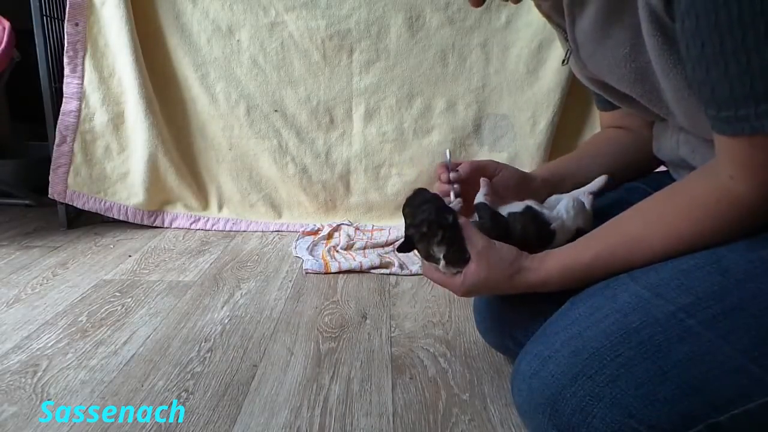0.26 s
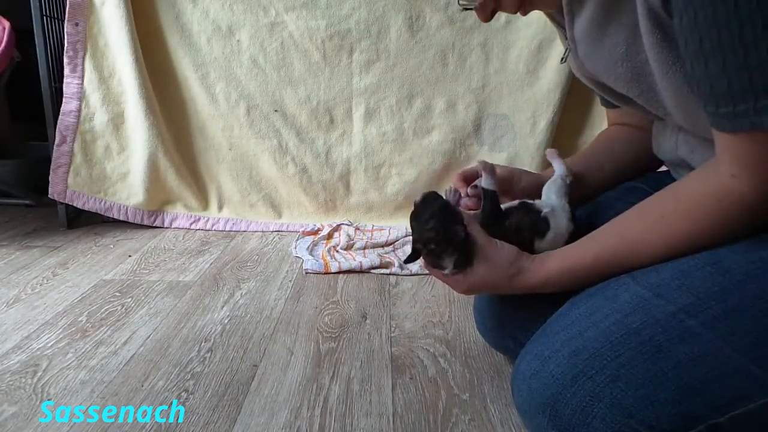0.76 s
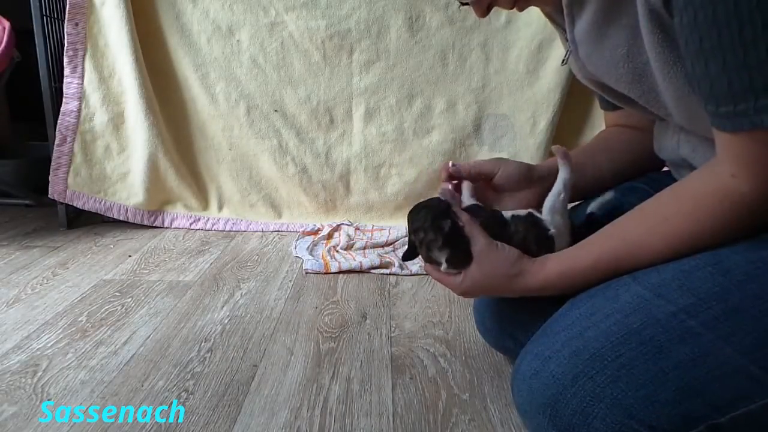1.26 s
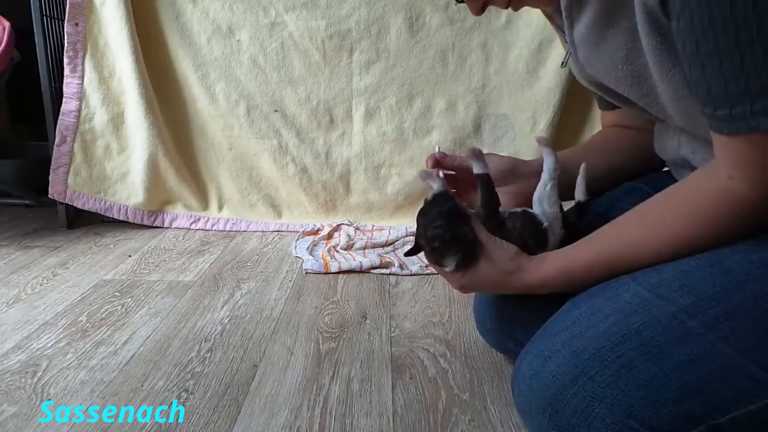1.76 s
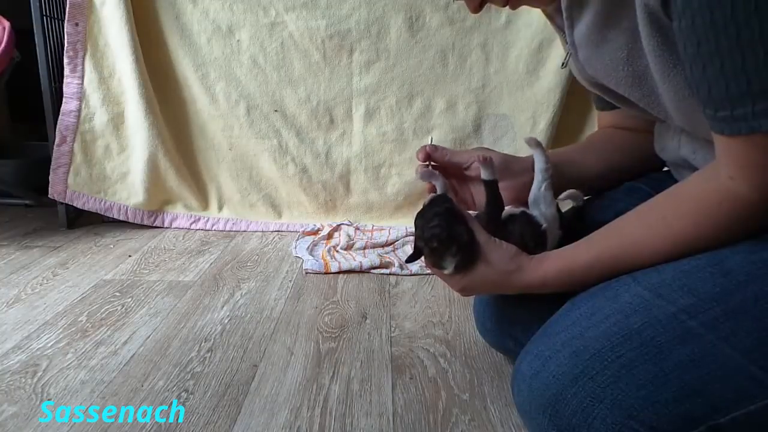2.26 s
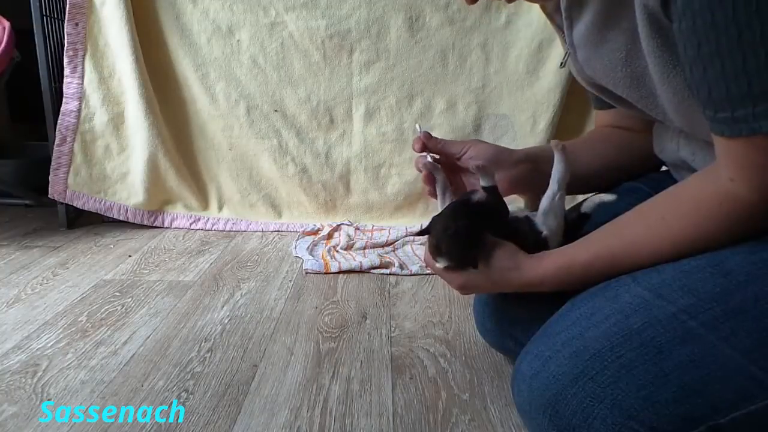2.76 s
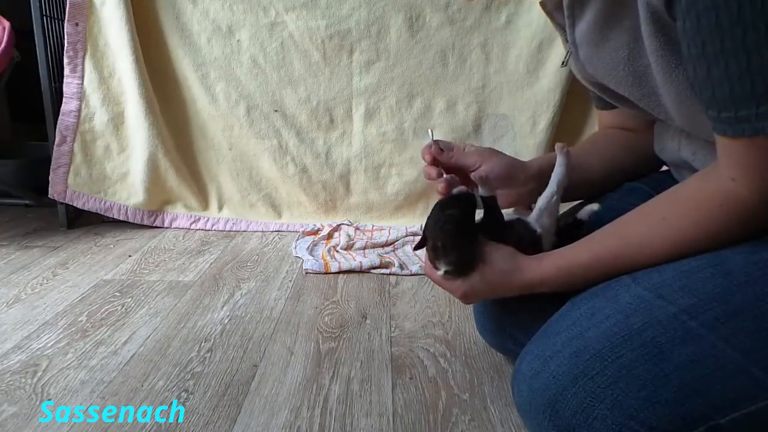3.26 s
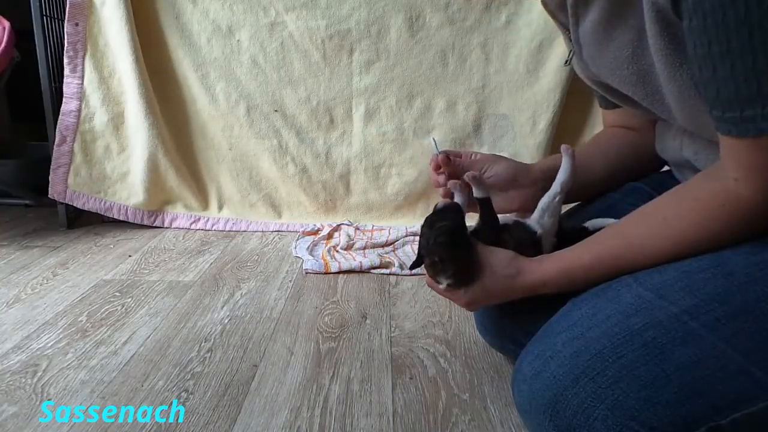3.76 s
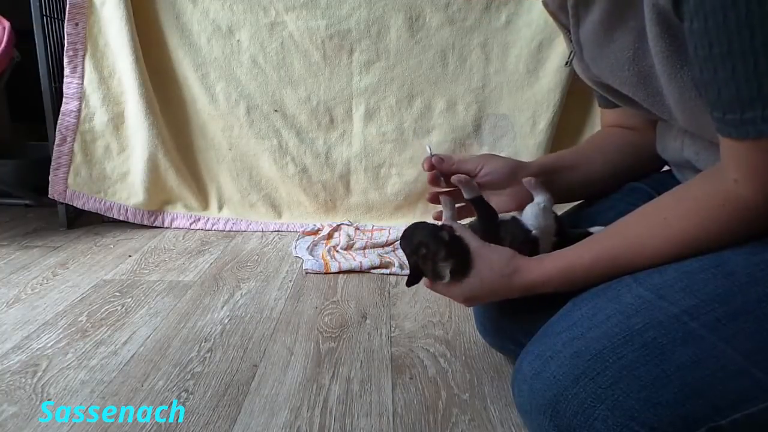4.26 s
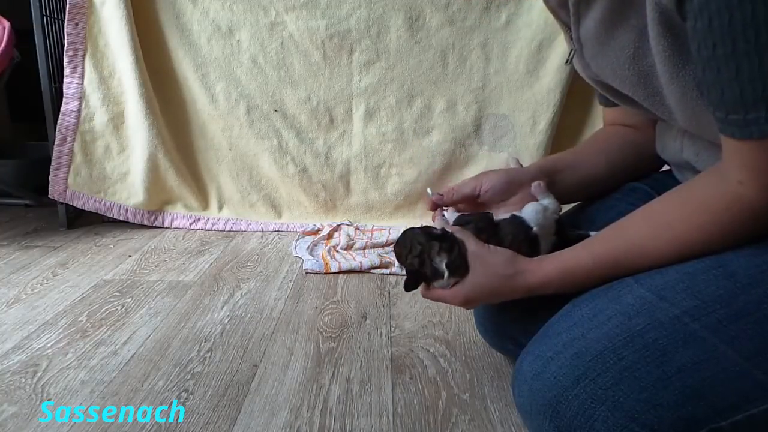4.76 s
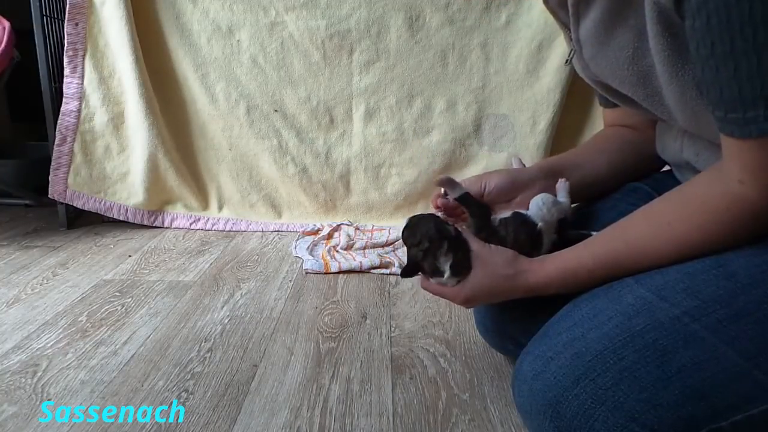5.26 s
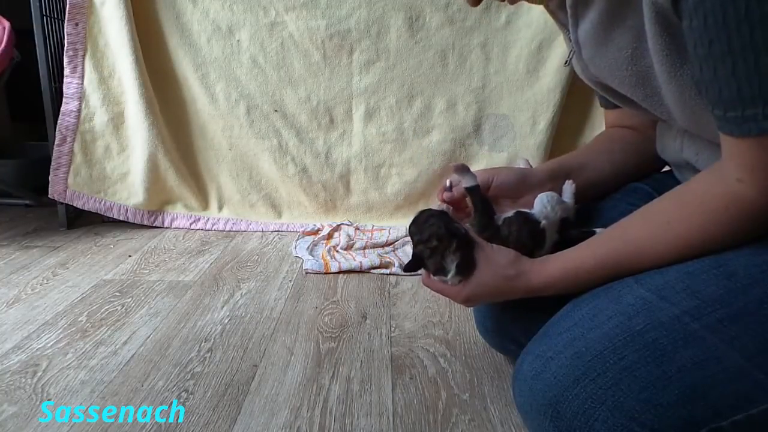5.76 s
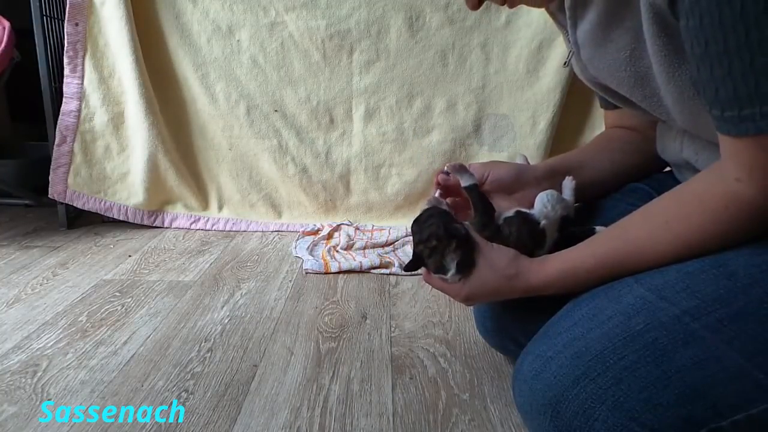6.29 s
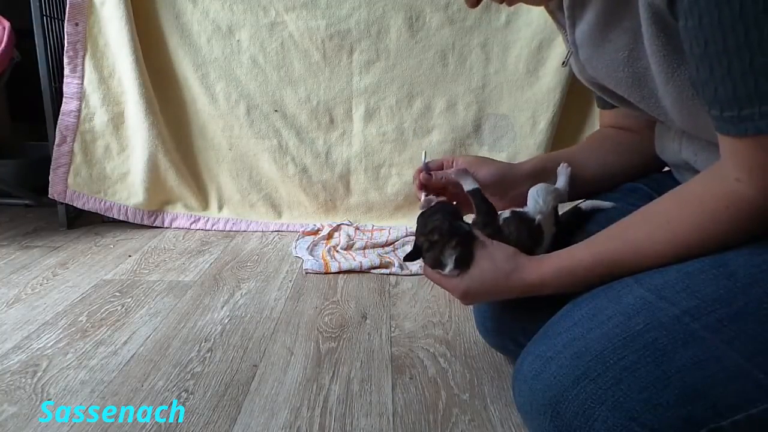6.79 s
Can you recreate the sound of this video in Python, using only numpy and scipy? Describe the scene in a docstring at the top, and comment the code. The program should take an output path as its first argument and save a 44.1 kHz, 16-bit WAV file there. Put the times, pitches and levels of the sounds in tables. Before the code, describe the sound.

Faint low grunts from a tiny puppy give way to a run of loud, thin, falling cries, with a few soft handling bumps indoors.

```python
"""A newborn puppy grunts, whimpers and then cries, held in someone's hands in a small hard-floored room.
Its vocal folds buzz and its breath rasps past them. A cry climbs from a hoarse start, breaks into a
nearly pure squeal around 2 kHz and falls away, sometimes with an added tone an octave below.
The hands bump softly, and the camera's noise suppressor turns the hiss down between the calls."""
import sys
import numpy as np
from scipy import signal
from scipy.fft import rfft, irfft, next_fast_len
from scipy.io import wavfile
from scipy.ndimage import uniform_filter1d, map_coordinates

SR = 44100
rng = np.random.default_rng(int(sys.argv[2]) if len(sys.argv) > 2 else 0)


def transcribe(signal):
    """Save signal, clipped to [-1, 1], as a 16-bit WAV file at the path in sys.argv[1]."""
    frames = np.atleast_2d(signal).T
    limited = np.clip(frames, -1, 1)
    pcm = np.round(limited * 32767).astype(np.int16)
    wavfile.write(sys.argv[1], SR, pcm)


N = 310023
TOP_HZ = 14600  # the highest frequency kept


def puppy():
    """All the grunts and squeals, from one throat and its breath."""
    # air rasping through the throat: f/Hz, level/dB
    rasp_spectrum = [(100, -22), (300, 6), (1000, 7), (2200, 0.5), (3200, -23), (5000, -45.5),
                     (8000, -47.5), (11000, -24.5), (15000, -25.5)]
    # air hissing out of the open mouth: f/Hz, level/dB
    mouth_spectrum = [(1500, -13.5), (2600, 8.5), (3300, 5), (4200, 0.5), (5200, -14), (6300, -6.5),
                      (7800, -11.5), (10000, -7), (14000, -5)]
    # low calls: start/s, top/s, end/s, start pitch/Hz, top pitch/Hz, end pitch/Hz, level/dB, swell/dB,
    # overtones against the lowest tone/dB, roughness/0-1, overtone slope/dB per octave, mouth resonance/Hz
    grunts = [(.005, 0.039, .135, 335, 381, 338, -50, -5.5, -5.5, 0.24, -1, 816),
              (0.371, 0.417, .49, 280, 306.2, 257, -70.5, 5, 12.5, 0.37, -7, 680),
              (0.737, 0.872, .935, 396, 1466, 630, -59, -2.5, -5, 0.92, -14, 2010),
              (1.613, 1.668, 1.75, 319, 338, 326, -67, -1, -5.5, 0.77, 3, 1293),
              (1.933, 1.947, 2.02, 277, 318.5, 310, -58, -14, -4, 0.36, -18, 664),
              (2.184, 2.25, 2.35, 260, 311.6, 280.3, -54.5, -1.5, -2.5, 0.63, -7, 556),
              (2.491, 2.553, 2.58, 285.4, 338, 318, -62, -1, -1.5, 1, -15, 1020),
              (2.573, 2.631, 2.71, 472, 1124, 460, -55.5, 4, -10, 0.49, -18, 1910),
              (4.469, 4.574, 4.745, 362.8, 500, 427, -52, 3, -2.5, 0.22, 2, 813),
              (4.899, 5.051, 5.15, 310, 438.5, 345.3, -54.5, -1, -1, 0.65, -7, 900),
              (4.965, 5.039, 5.14, 355.8, 1222, 497, -45, 6, -2.5, 0.47, -1.5, 2190)]
    # high cries: hoarseness, brightness/dB, overtone slope/dB per octave, mouth resonance/Hz,
    # list of (t/s, pitch/Hz, level/dB)
    squeals = [ (0.25, -1.5, -18, 5460, [(1.125, 1610, -57.5), (1.188, 1770, -63.5), (1.196, 1787, -35.5),
               (1.248, 1850, -44.5), (1.256, 1882, -39.5), (1.285, 2040, -42.5), (1.315, 2004, -49.5),
               (1.365, 1184, -64.5)]), (0.99, 0, -8.5, 3100, [(2.895, 1558, -66.5), (2.93, 1715, -52.5),
               (2.965, 1875, -46.5), (3, 1760, -45), (3.04, 1672, -47), (3.07, 1409, -56),
               (3.125, 1376, -61.5)]), (0.47, -1.5, -17, 10800, [(3.255, 1126, -62), (3.3, 1674, -45.5),
               (3.318, 1655, -41), (3.338, 2138, -26.5), (3.37, 2246, -29), (3.45, 2189, -33),
               (3.485, 1938, -39.5), (3.535, 1765, -44), (3.56, 1287, -52), (3.59, 1202, -54)]),
               (1.23, 0.5, -16, 12300, [(3.735, 1140, -60.5), (3.77, 1924, -45.5), (3.83, 2173, -40),
               (3.841, 2383, -26), (3.865, 2326, -36.5), (3.96, 1992, -38), (4.03, 1986, -52),
               (4.18, 1887, -45.5), (4.205, 1289, -56.5), (4.24, 1196, -53)]),
               (0.58, -1.5, -10, 10400, [(5.315, 474, -61), (5.36, 1071, -45.5), (5.368, 1694, -40.5),
               (5.404, 1793, -38.5), (5.411, 2035, -26), (5.445, 2131, -21.5), (5.472, 2032, -22),
               (5.515, 1665, -41.5), (5.548, 1449, -40.5), (5.6, 1312, -68)]),
               (1.27, -1.5, -5.5, 10000, [(5.78, 399.3, -61), (5.848, 1075, -46), (5.856, 1627, -51),
               (5.905, 1906, -36.5), (5.945, 1890, -40.5), (6, 1637, -47.5), (6.028, 1407, -52),
               (6.075, 1443, -58.5)]), (0.98, -2.5, -9, 11000, [(6.247, 482.8, -60), (6.305, 1045, -48.5),
               (6.33, 1403, -48), (6.397, 1643, -51.5), (6.405, 1744, -40), (6.44, 1720, -56),
               (6.475, 1589, -49), (6.492, 946, -52), (6.52, 911, -64)]),
               (0.51, -0.5, -12.5, 5900, [(6.7, 1085, -60.5), (6.742, 1763, -45.5), (6.775, 1680, -47),
               (6.795, 2028, -28), (6.815, 2029, -23), (6.852, 1936, -34), (6.876, 1796, -38),
               (6.915, 1421, -48.5), (6.98, 1395, -60.5)])]
    air = np.array([noise(rasp_spectrum), noise(mouth_spectrum)])
    return sum(grunt(row, air) for row in grunts) + sum(squeal(row, air) for row in squeals)


def squeal(row, air, easy_db=-39.5, rough_per_db=0.002):
    """A high cry: hoarse and rich while low, nearly pure at the top, shrill where the puppy strains."""
    # the higher, the purer: pitch/Hz, overtones against the lowest tone/dB, roughness/0-1
    register = [(500, 7, 0.32), (1060, -0.5, 0.45), (1490, -11.5, 0.33), (1717, -18, 0.09),
                (1950, -21.5, 0.03), (2380, -23.5, 0.03)]
    # moments of strain: t/s, half length/s, change in the overtones/dB
    strains = [(1.249, 0.068, 20), (3.081, 0.013, 15.5), (3.338, 0.05, 9.5), (3.817, 0.029, 6),
               (4.225, 0.016, -2.5), (5.432, 0.0056, 4.5), (6.841, .025, 11), (6.933, 0.045, 23.5)]
    hoarseness, bright_db, slope_db, mouth_hz, course = row
    times, hz, db = np.transpose(course)
    t, fade = span(times[0], times[-1])
    pitch, level_db = np.interp(t, times, hz), np.interp(t, times, db)
    register_hz, register_db, register_rough = np.transpose(register)
    strain_db = sum(raised_db * bell(t, when, width) for when, width, raised_db in strains)
    effort_db = 0.099 * (level_db - easy_db)  # louder is also brighter
    overtones_db = np.interp(pitch, register_hz, register_db) + bright_db + strain_db + effort_db
    rough = hoarseness * np.interp(pitch, register_hz, register_rough) + rough_per_db * strain_db
    return voice(t, fade, pitch, level_db, overtones_db, rough, slope_db, mouth_hz, air)


def grunt(row, air, swoop_s=0.047, waver=0.015, lumpy_db=0.86, start_dip_db=2, end_dip_db=9.5):
    """A low call that swells and sinks while its pitch swoops up and back."""
    start, top, end, start_hz, top_hz, end_hz, db, swell_db, overtones_db, rough, slope_db, mouth_hz = row
    t, fade = span(start, end)
    swoop = bell(t, top, swoop_s)
    rest_hz = np.where(t < top, start_hz, end_hz)
    pitch = (rest_hz + (top_hz - rest_hz) * swoop) * (1 + waver * wobble(70, len(t)))
    from_middle = np.interp(t, [start, end], [-1, 1])
    dip_db = np.where(from_middle < 0, start_dip_db, end_dip_db) * np.abs(from_middle) ** 2.04
    level_db = db + swell_db * from_middle / 2 - dip_db + lumpy_db * wobble(51, len(t))
    rough = rough * (1 - 0.4 * swoop)  # clearest at the top
    return voice(t, fade, pitch, level_db, overtones_db, rough, slope_db, mouth_hz, air)


def voice(t, fade, pitch, level_db, overtones_db, rough, slope_db, mouth_hz, air,
          mouth_db=10, mouth_octaves=0.11, tremor=0.0038, hiss_db=-21):
    """One call: the vocal folds beat at the pitch; the rougher they beat, the more air rasps past."""
    # resonances of the tiny throat: f/Hz, gain/dB
    throat = [(300, 21), (1100, 21.5), (1600, 7), (2200, 12), (2900, -8), (4100, -22.5), (5000, -17),
              (6200, -12), (7800, -21.5), (9000, -8), (10500, -9.5), (12500, -6), (14500, -19)]
    first, size = round(t[0] * SR), len(t)
    rough = np.clip(rough, 0, 1)
    # no two beats last quite as long, least of all in a hoarse voice
    scatter = (0.004 + 0.075 * rough) * wobble(650, size)
    pitch = pitch * (1 + tremor * wobble(90, size) + scatter)
    phase = 2 * np.pi * np.cumsum(pitch) / SR
    # overtones are multiples of the pitch; they slide through the resonances of throat and mouth
    multiple = np.arange(2, 17)[:, None]
    hz = multiple * pitch
    boost_db = mouth_db * np.exp(-(np.log2(hz / mouth_hz) / mouth_octaves) ** 2)
    weights = amp(along(throat, hz) + boost_db + slope_db * np.log2(multiple)) * (hz < TOP_HZ)
    overtones = np.sum(weights * np.sin(multiple * phase), axis=0) / np.linalg.norm(weights, axis=0)
    tone = amp(level_db) * (np.sin(phase) + amp(overtones_db) * overtones) + voice_break(t, phase)
    flutter = (1 + rough * wobble(300, size)) * amp(wobble(70, size))
    throat_air, mouth_air = air[:, first:first + size]
    hiss = amp(level_db + overtones_db + hiss_db) * mouth_air
    puffs = (1 + np.sin(phase)) * throat_air  # one each time the folds open
    rasp = 0.6 * rough ** 1.2 * amp(level_db) * np.hypot(1, amp(overtones_db)) * puffs
    call = fade * (np.sqrt(2) * tone * flutter + rasp + hiss)
    return np.pad(call, (first, N - first - size))


def voice_break(t, phase, rise_s=0.004, fall_s=0.0096):
    """As some cries run out, the folds beat unevenly and add a tone an octave below."""
    # stretches of uneven beating: start/s, end/s, level/dB
    breaks = [(3.095, 3.102, -58), (5.561, 5.595, -50), (6.037, 6.059, -49), (6.926, 6.97, -55)]
    strength = sum(amp(db) * np.interp(t, [start - rise_s, start, end, end + fall_s], [0, 1, 1, 0])
                   for start, end, db in breaks)
    return strength * np.sin(phase / 2)


def hands():
    """Dull bumps as the grip on the wriggling puppy shifts."""
    # soft bumps: t/s, level/dB, half length/s
    bumps = [(1.262, -69, 0.024), (4.176, -53.5, 0.021), (5.046, -53.5, 0.042), (6.898, -66.5, 0.13)]
    # a hand on fur and cloth: f/Hz, level/dB
    thud_spectrum = [(40, -41), (110, -6), (170, 5), (260, -10.5), (600, -48), (3000, -76.5)]
    t = np.arange(N) / SR
    return noise(thud_spectrum) * sum(amp(db) * bell(t, when, width) for when, db, width in bumps)


def room(x, gap_s=0.0037, build_s=0.004):
    """The walls keep each passing pitch ringing, so it beats against the gliding voice."""
    # the room's ring: f/Hz, time to fade by 60 dB/s
    ring_times = [(200, 0.3), (2000, 0.35), (6000, 0.29), (13000, 0.25)]
    # the mouth aims its treble past the microphone: f/Hz, direct sound/dB, sound off the walls/dB
    beam = [(2270, 0, -0.5), (4000, -8.5, -1.5), (10000, -2, 3)]
    # standing waves between floor and walls lift or weaken low notes: f/Hz, gain/dB
    standing_waves = [(250, -0.5), (335, 1.5), (375, -1.5), (425, 4), (495, -9), (570, -0.5), (650, -0.5),
                      (780, 0), (950, 0), (1150, -1)]
    hz, t, spectra = signal.stft(rng.standard_normal(SR // 2), SR, nperseg=256)
    decay = amp(-60 * t / along(ring_times, hz)[:, None])
    tail = signal.istft(spectra * decay, SR, nperseg=256)[1]
    tail *= np.clip((np.arange(len(tail)) / SR - gap_s) / build_s, 0, 1)
    ring = signal.fftconvolve(x, tail / np.linalg.norm(tail))[:N]
    beam_hz, direct_db, walls_db = np.transpose(beam)
    direct = filtered(x, lambda hz: amp(np.interp(hz, beam_hz, direct_db)))
    walls = filtered(ring, lambda hz: amp(np.interp(hz, beam_hz, walls_db)))
    return filtered(direct + walls, lambda hz: amp(along(standing_waves, hz)))


def background_hiss():
    """The faint, steady noise of the room and the microphone."""
    # low room noise and hiss: f/Hz, level/dB
    hiss_spectrum = [(25, -24), (45, -14), (70, -4.5), (108, -5.5), (128, 6.5), (148, -2), (220, -6.5),
                     (400, -10.5), (1000, -14.5), (2000, -25.5), (4000, -26.5), (7500, -26.5),
                     (11000, -26.5), (14500, -28.5)]
    return amp(-61) * noise(hiss_spectrum)


def suppressor(x, closed_db=-63, open_db=-50, depth_db=12, bass_share=0.8, window_s=0.054, glide_s=0.067):
    """Turns everything down while the voice's range is quiet, the bass less so."""
    voice_band = filtered(x, lambda hz: (hz > 250) & (hz < 3000))
    power = np.abs(uniform_filter1d(voice_band ** 2, int(window_s * SR)))
    level_db = 10 * np.log10(power + 1e-12)
    quietness = np.clip((open_db - level_db) / (open_db - closed_db), 0, 1)
    cut_db = uniform_filter1d(depth_db * quietness, int(glide_s * SR))
    bass = filtered(x, lambda hz: 1 / (1 + (hz / 200) ** 4))
    return bass * amp(-bass_share * cut_db) + (x - bass) * amp(-cut_db)


def span(start, end, attack_s=0.008, release_s=0.0061):
    """The sample times of one call, and its fade in and out."""
    t = np.arange(max(0, int((start - attack_s) * SR)), min(N, int((end + release_s) * SR))) / SR
    return t, np.interp(t, [start - attack_s, start, end, end + release_s], [0, 1, 1, 0])


def bell(t, centre, width):
    """A smooth hump of height 1."""
    return np.exp(-0.5 * ((t - centre) / width) ** 2)


def amp(db):
    """Turns decibels into a number to multiply by."""
    return 10 ** (np.asarray(db) / 20)


def along(points, hz):
    """Reads between (f/Hz, value) points, with octaves evenly spaced."""
    point_hz, values = np.transpose(points)
    return np.interp(np.log(hz + 1), np.log(point_hz), values)


def wobble(rate, size):
    """A smooth curve through `rate` random values a second."""
    return map_coordinates(rng.standard_normal(size // 8 + 4), [np.arange(size) * rate / SR], mode="wrap")


def filtered(x, response):
    """Multiplies each frequency in x by response(hz)."""
    size = next_fast_len(len(x) + 8192)
    return irfft(rfft(x, size) * response(np.fft.rfftfreq(size, 1 / SR)), size)[:len(x)]


def noise(spectrum):
    """Noise shaped by (f/Hz, level/dB) points, with an average power of 1."""
    x = filtered(rng.standard_normal(N), lambda hz: amp(along(spectrum, hz)))
    return x / np.sqrt(np.mean(x ** 2) + 1e-20)


def scene():
    """Puppy and hands in the room, over a steady hiss."""
    return (room(puppy() + hands()) + background_hiss())[None]


def record(dry):
    """The camera turns down the noise and cuts off the highest treble."""
    return filtered(suppressor(dry[0]), lambda hz: hz < TOP_HZ)[None]


dry = scene()
out = record(dry)
transcribe(out)
```